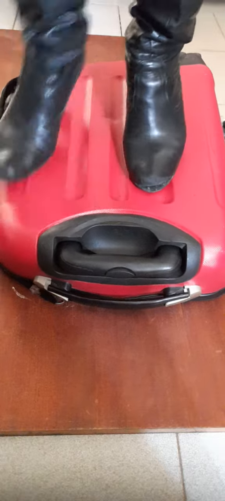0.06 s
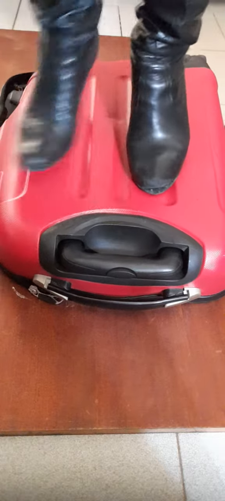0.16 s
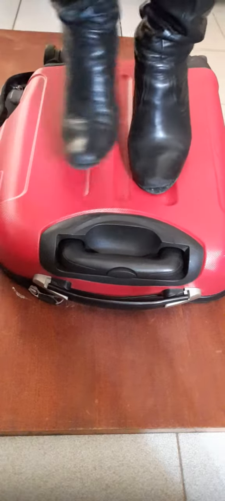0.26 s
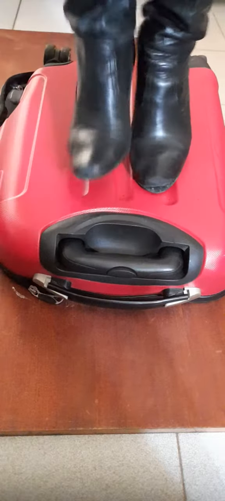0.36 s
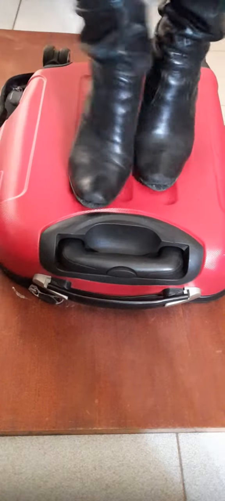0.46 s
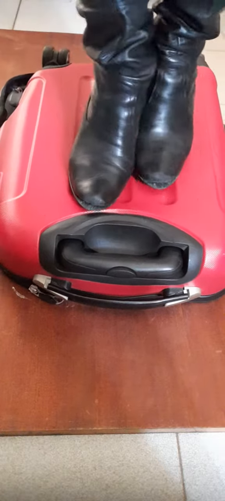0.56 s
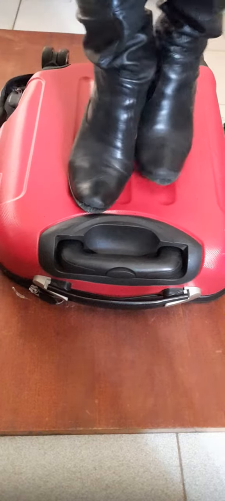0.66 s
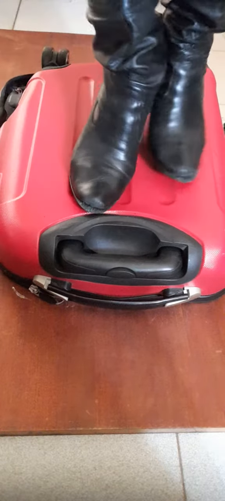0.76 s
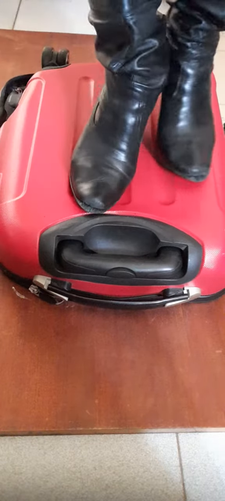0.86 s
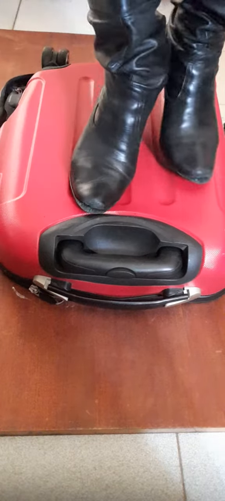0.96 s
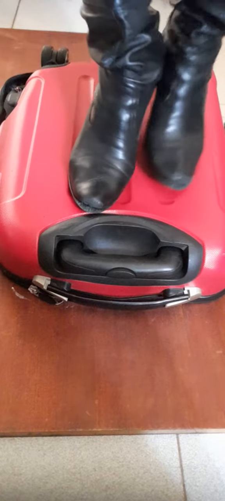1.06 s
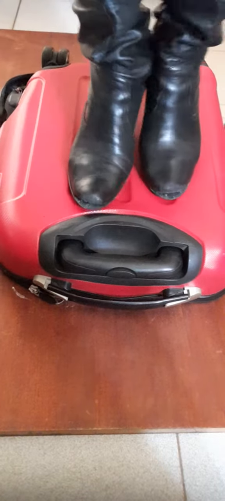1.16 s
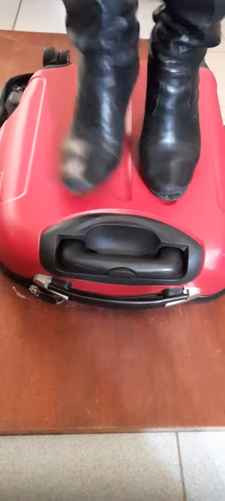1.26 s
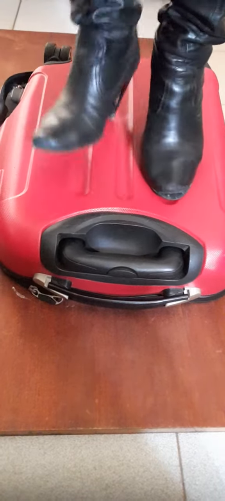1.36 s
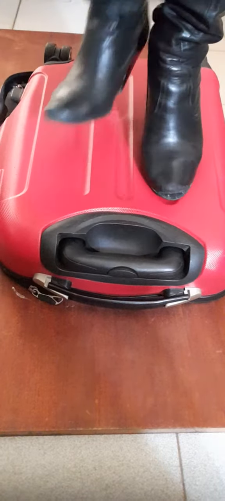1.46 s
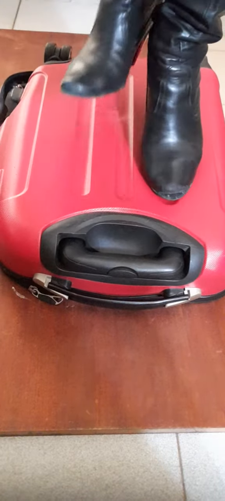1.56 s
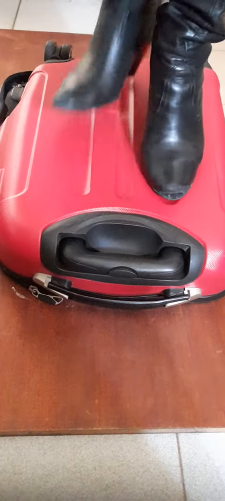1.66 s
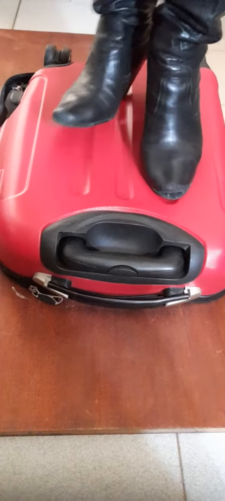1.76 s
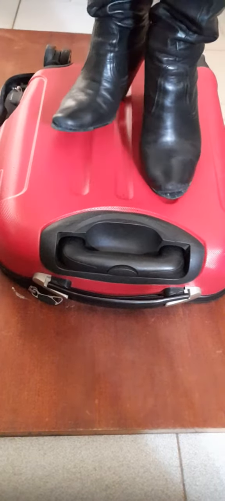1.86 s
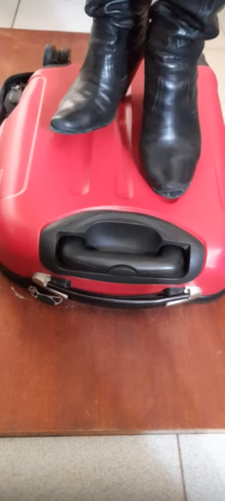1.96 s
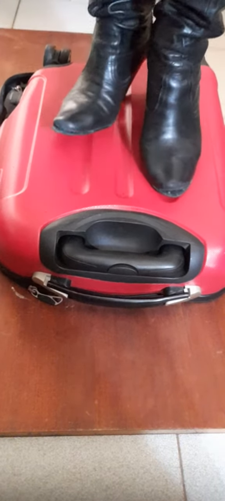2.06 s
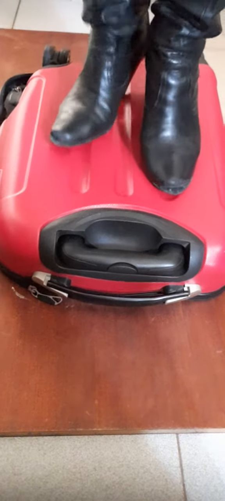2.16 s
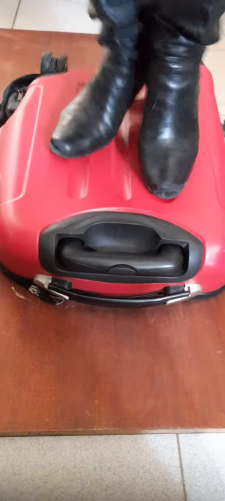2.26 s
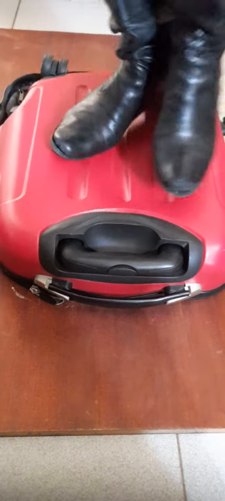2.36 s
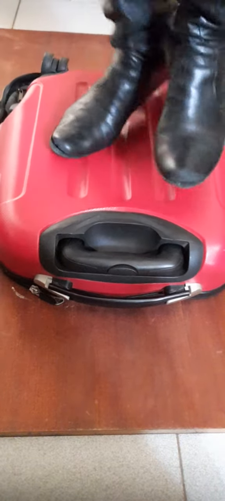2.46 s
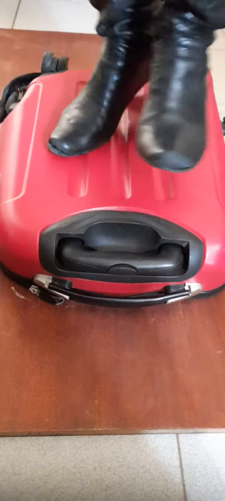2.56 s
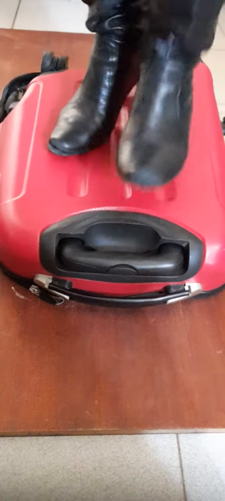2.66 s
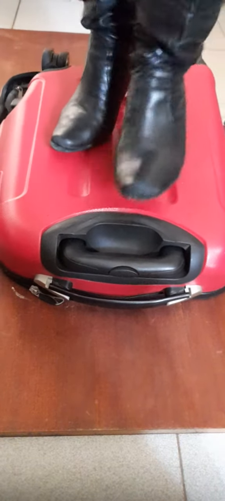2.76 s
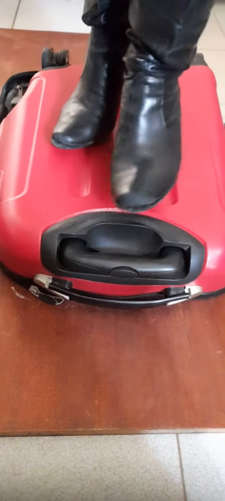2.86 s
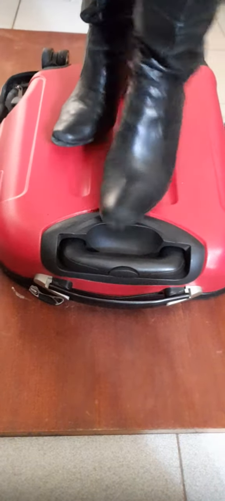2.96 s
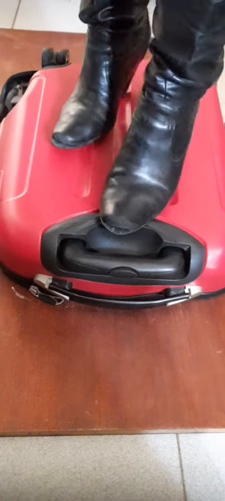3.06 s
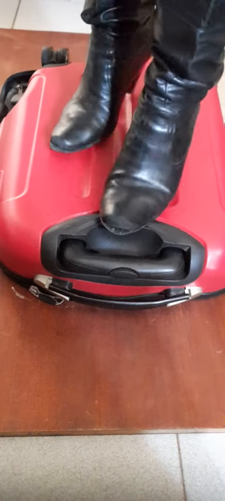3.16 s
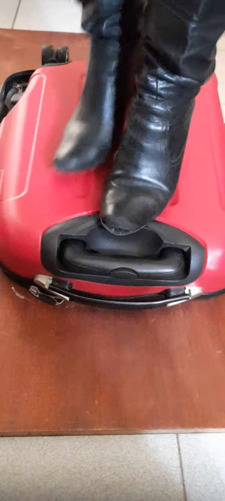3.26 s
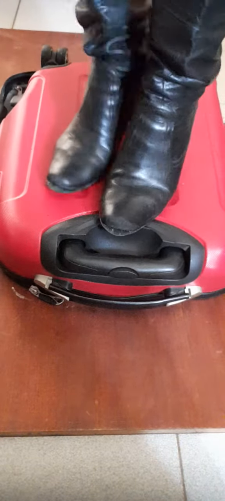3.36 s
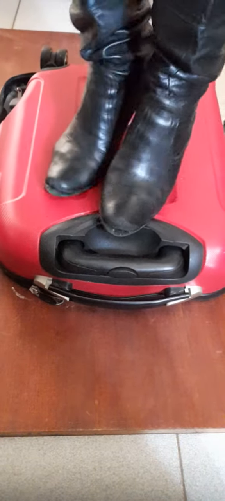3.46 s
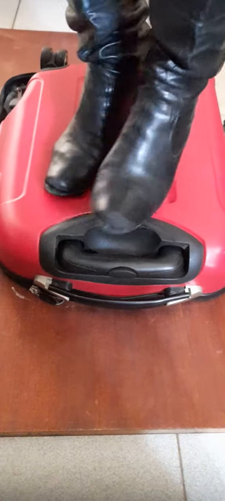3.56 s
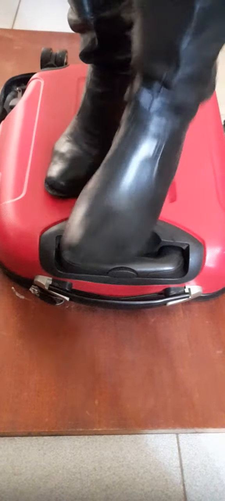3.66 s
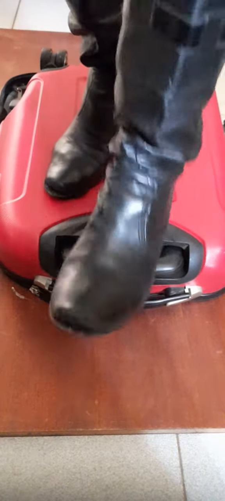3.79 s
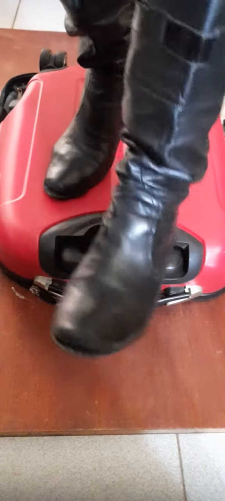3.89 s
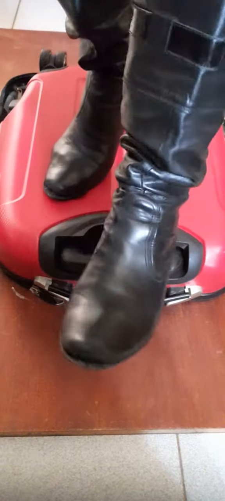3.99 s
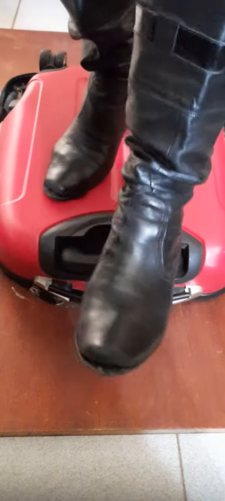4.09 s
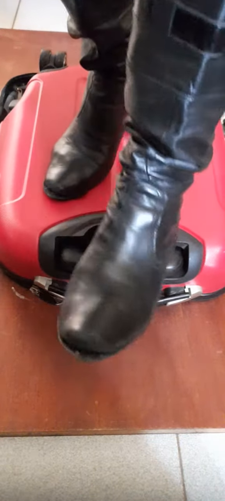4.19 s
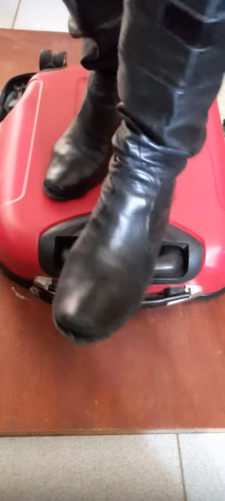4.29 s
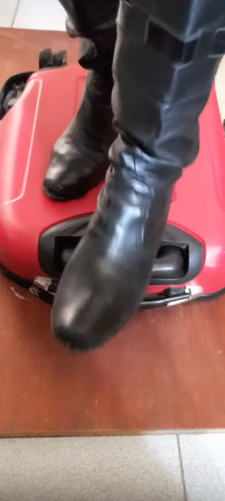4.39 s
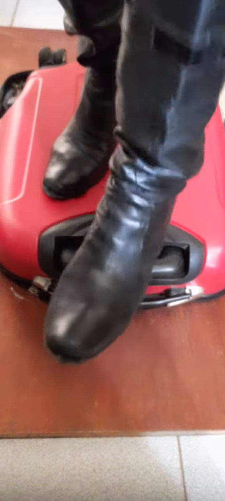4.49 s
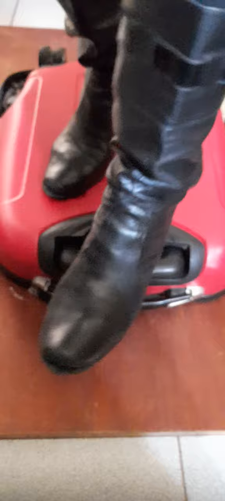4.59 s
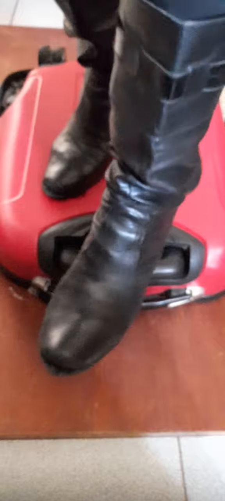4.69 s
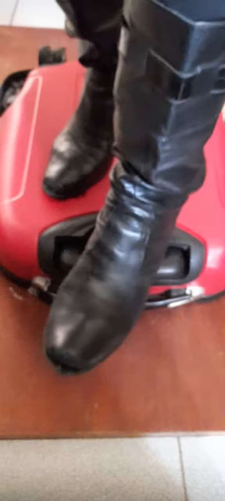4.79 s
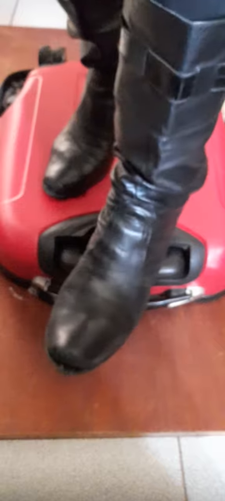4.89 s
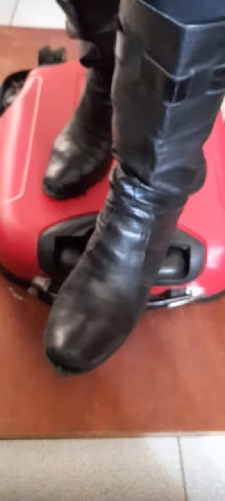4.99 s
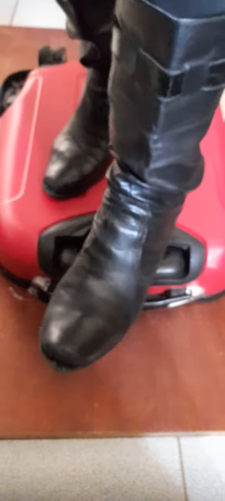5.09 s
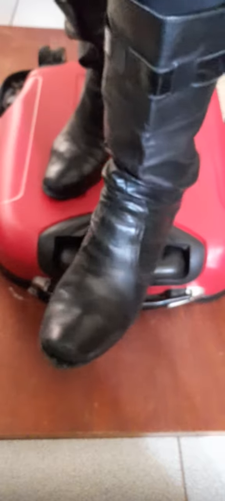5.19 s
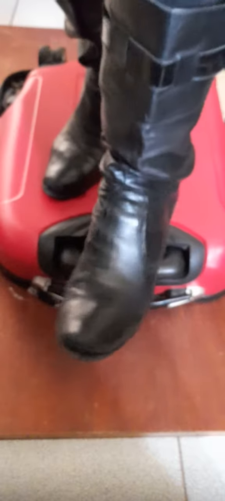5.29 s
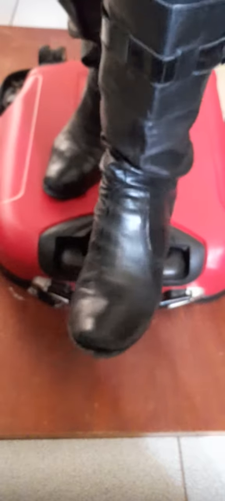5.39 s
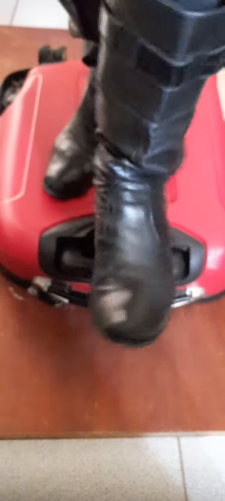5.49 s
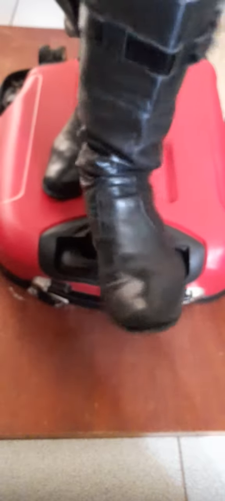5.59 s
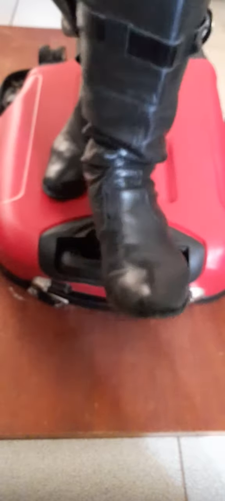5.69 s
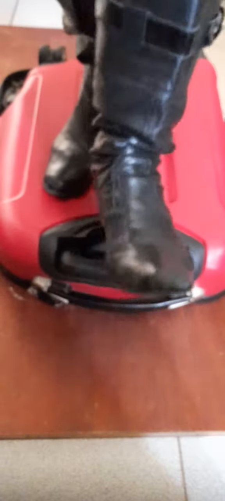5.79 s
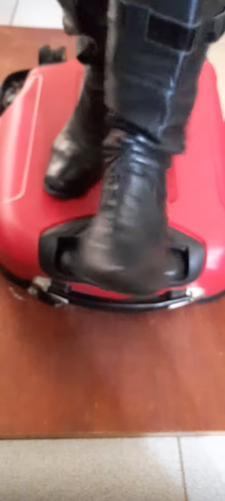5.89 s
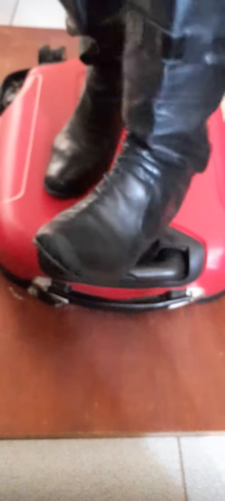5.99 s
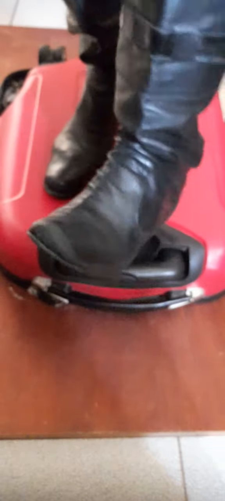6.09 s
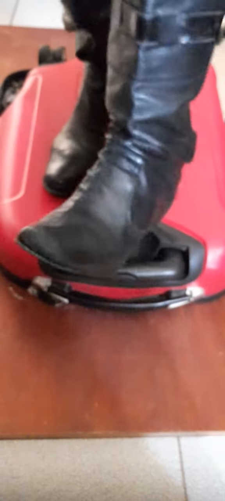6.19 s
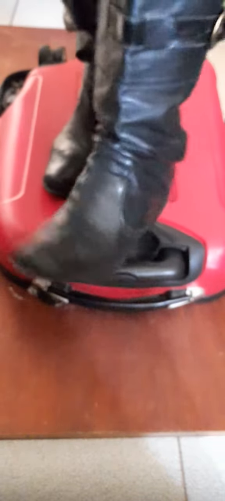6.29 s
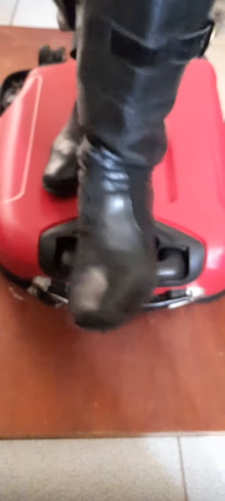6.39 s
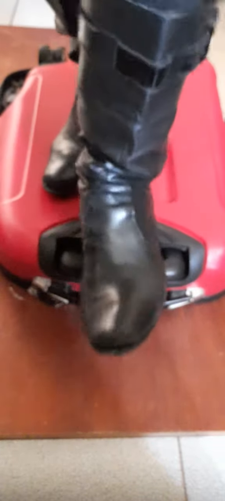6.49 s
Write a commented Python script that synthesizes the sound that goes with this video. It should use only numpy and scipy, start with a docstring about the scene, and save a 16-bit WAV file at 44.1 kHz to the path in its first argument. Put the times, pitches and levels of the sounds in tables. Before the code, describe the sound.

High-heeled boots tread unevenly on a hollow hard plastic suitcase, booming thuds with sharp snaps, creaks and faint zip jingles in a small room.

```python
"""High-heeled boots tread on a hard plastic suitcase lying on boards in a small tiled room, near a phone.
Treads boom, knock and snap at once; after a second weight rolls onto one foot and the plastic creaks. Harder
treads follow, the pull handle pings just after four seconds, and faint contacts close the scene. Soles scuff
and zip pulls jingle throughout. Shell and metal are decaying sines; cracks, snaps, scuffs and air are noise.
The room adds a diffuse tail; the two microphone ports differ in colour and delay."""
import sys
import numpy as np
from scipy import signal
from scipy.fft import rfft, irfft, next_fast_len
from scipy.io import wavfile

SR = 44100
rng = np.random.default_rng(int(sys.argv[2]) if len(sys.argv) > 2 else 0)


def int16_out(signal):
    """Quantize to a 16-bit WAV file."""
    q = np.round(np.clip(np.atleast_2d(signal).T, -1, 1) * 32767)
    wavfile.write(sys.argv[1], SR, q.astype(np.int16))


N = 288414  # length in samples

# Source levels are those ahead of the room and the microphone.
# still air, relative spectrum: (frequency [Hz], density [dB])
AIR_COLOUR = [(18, -65.5), (30, -3), (90, -44.5), (245, -14), (295, -5), (632, -13), (760, -11.5),
              (1190, -18), (2680, -19), (3980, -23), (4910, -12), (7470, -34.5), (9460, -18.5),
              (13700, -19.5), (16000, -50.5)]
AIR_RMS_DB = -68.5
# mains hum: (frequency [Hz], rms level [dB])
MAINS_HUM = [(99, -78.5), (297, -70.5)]
# diffuse tail of the room: (frequency [Hz], t60 [s], level [dB])
ROOM_TAIL = [(100, 0.46, 2), (189, 0.31, -7.5), (710, 0.46, 0.5), (1940, 0.39, 1), (4840, 0.34, 1),
             (11760, 0.34, -6)]
# likeness of diffuse sound at both ports: (frequency [Hz], likeness [share])
PORT_LIKENESS = [(100, 1), (400, 0.89), (1000, 0.86), (2500, 0.11), (6000, 0.1)]

# colour of the ports: (frequency [Hz], left minus right [dB])
PORT_BALANCE = [(60, -0.5), (110, -0.5), (200, 0.0), (380, -0.5), (700, -3.5), (1290, -5.5), (2380, -6.0),
                (4400, 1.5), (8120, 7.0), (15000, 14.0)]
# arrival at the ports: (frequency [Hz], lead of the left [s])
LEFT_LEAD = [(100, .00005), (600, .00013), (1550, .00032), (2300, .0004), (4000, .00036)]
# microphone colour common to both ports: (frequency [Hz], gain [dB])
CAPSULE_COLOUR = [(3000, 1.5), (3800, 0), (5000, 0.5), (7500, -6), (9500, -3.5), (14000, -4.5),
                  (15000, -17), (16300, -29.5)]
TOP_HZ, ROUND_AT = 16300, 1.2  # top cut; amplitude that rounded peaks approach

# soles scuffing on the shell: (loudest moment [s], level [dB], hiss above level [dB], swell [s])
SCUFFS = [(0.188, -46, 4, 0.3), (0.47, -38.5, -7, 0.051), (0.751, -62.5, 6, 0.296), (1.3, -51, -5, 0.18),
          (1.4, -51.5, 4.5, 0.076), (1.769, -39.5, -0.5, 0.058), (1.92, -68, -17.5, 0.16),
          (2.172, -58, 12.5, 0.028), (2.298, -40, -4, 0.23), (2.361, -33.5, -6.5, 0.026),
          (2.692, -45.5, 2, 0.009), (2.788, -68.5, 11, 0.3), (3.05, -55, -1, 0.043),
          (3.352, -43, -6.5, 0.0097), (3.762, -38.5, -1.5, 0.012), (3.93, -44, -8, 0.15),
          (4.0, -51.5, -5, 0.11), (4.221, -43, -9, 0.015), (4.241, -55, 21.5, 0.015),
          (4.441, -48, -1.5, 0.025), (5.301, -68, 3, 0.9), (5.478, -58, -6, 0.12),
          (5.639, -63.5, -4.5, 0.12), (5.988, -58, 1.5, 0.14), (6.05, -86, 7.5, 0.14),
          (6.39, -58.5, -2, 0.06), (6.5, -65.5, 2.5, .08)]
SWELL_DB = 28.5  # rise over the swell
RUB_FADE_DB_S, HISS_FADE_DB_S = 124.5, 151.5  # fading after the loudest moment, dB per second

# zip pulls knocking: (time [s], peak level [dB])
PULL_HITS = [(0.175, -36), (0.786, -40), (1.9804, -46.5), (2.61, -46), (3.092, -44), (3.4354, -40),
             (3.9494, -52), (4.508, -39), (5.5636, -35.5), (5.8376, -49.5), (6.0227, -30.5), (6.2986, -48),
             (6.4006, -40.5)]
# zip pull modes: (frequency [Hz], relative level [dB], t60 before the ring factor [s])
PULL_MODES = [(6880, -9, .02), (9930, -1, 0.026), (11400, 3, 0.09), (13500, 10, .03), (14050, -8, .03)]
# pull handle knocking: (time [s], peak level [dB])
HANDLE_KNOCKS = [(4.237, -16), (4.265, -57)]
# pull handle modes: (frequency [Hz], relative level [dB], t60 before the ring factor [s])
HANDLE_MODES = [(772, -2.5, 0.078), (1510, 6, 0.034), (1800, 4, 0.06), (2640, -7, 0.17)]

# snaps of plastic and leather under load: (time [s], peak level [dB], pitch [Hz])
SNAPS = [(0.1731, -15.5, 11400), (0.1902, -19, 3900), (0.221, -32, 13500), (0.2577, -30.5, 13500),
         (0.342, -49, 4010), (0.45, -29, 4580), (0.469, -9.5, 4140), (0.4968, -20.5, 8940),
         (0.6868, -39, 4560), (0.7087, -48, 4720), (1.1614, -38.5, 5050), (1.276, -32.5, 3800),
         (1.735, -23, 4290), (1.766, -19, 5000), (1.7758, -15, 4140), (1.814, -17.5, 11200),
         (1.8402, -20, 4100), (2.1465, -40, 4890), (2.167, -16.5, 4900), (2.2733, -34, 12200),
         (2.3157, -14.5, 5530), (2.333, -15.5, 3920), (2.6846, -23.5, 5150), (2.7138, -25, 4250),
         (2.7458, -20.5, 8050), (2.7808, -24.5, 4060), (3.0087, -46, 4950), (3.0419, -30, 4800),
         (3.1887, -44.5, 9850), (3.347, -33.5, 5130), (3.7519, -20.5, 4650), (3.8134, -23.5, 3900),
         (3.8377, -17.5, 12800), (3.8737, -23, 5400), (3.9766, -20.5, 7150), (4.2196, -28.5, 4350),
         (4.2372, -10, 5670), (4.4464, -24, 6540), (4.564, -36, 3990), (5.249, -42, 4520),
         (5.465, -42, 4690), (5.483, -40.5, 4300), (5.5597, -40, 14400), (6.385, -47.5, 11500)]
SNAP_TAIL, CREAK_TAIL = 0.58, 0.1  # rustle after a snap, relative to its start
# weight rolling onto one foot makes the plastic tick in an uneven run
CREAK_FROM_S, CREAK_TO_S, CREAK_GAP_S = 1.195, 1.44, 0.019
CREAK_DB, CREAK_SCATTER_DB, CREAK_HZ = -33, 3.0, 8020  # middle level, its spread, middle pitch

# contacts of heel and sole: (time [s], boom peak [dB], body peak [dB], knock peak [dB], boom pitch [Hz]) # each
# layer is set to its peak before the bass cut
TREADS = [(0.056, -37.5, -38, -43, 187), (0.094, -26, -13, -59, 200), (0.153, -11, -21, -26, 187),
          (0.182, -22.5, -25, -25, 163), (0.451, -18.5, -23.5, -23.5, 194.7),
          (0.468, -13.5, -14.5, -15, 160), (0.52, -22, -33, -44, 150.6), (0.812, -41, -42, -60, 219.6),
          (1.127, -40.5, -38, -49, 195), (1.161, -26, -26.5, -36.5, 164), (1.196, -26.5, -28, -31.5, 168.4),
          (1.292, -30, -34.5, -36, 185.8), (1.369, -36, -26.5, -39, 205), (1.385, -33, -33, -42.5, 140),
          (1.436, -25.5, -31.5, -38.5, 191), (1.511, -42, -45, -59.5, 208.3),
          (1.735, -19, -9.5, -34.5, 168), (1.749, -14.5, -13.5, -21, 160.5), (1.764, -14, -13, -14.5, 155),
          (1.791, -17.5, -31, -41, 154.6), (1.882, -29, -51, -35.5, 171.6), (1.983, -36.5, -55, -56.5, 184),
          (2.076, -41.5, -37.5, -57.5, 231.8), (2.101, -37, -38, -43.5, 193.8),
          (2.154, -30.5, -25, -50.5, 206), (2.165, -28, -28.5, -20, 184), (2.211, -25.5, -35, -36.5, 166),
          (2.244, -30.5, -23, -44, 204), (2.317, -23.5, -13, -15, 242), (2.332, -14.5, -16, -26.5, 186),
          (2.364, -7, -6, -8.5, 193.3), (2.383, -14, -10.5, -27, 255), (2.42, -19, -15, -31.5, 199),
          (2.637, -50, -31, -31, 218), (2.681, -49.5, -29.5, -30, 208.6), (2.714, -12.5, -16, -19, 223),
          (2.779, -37, -41.5, -39, 172), (3.011, -79, -45.5, -46, 174), (3.043, -25, -28, -30.5, 171),
          (3.259, -43, -49, -50, 178), (3.35, -27, -34, -30.5, 202), (3.358, -26.5, -28, -45, 261.5),
          (3.381, -30, -27, -41, 167.5), (3.511, -27.5, -38, -50.5, 168), (3.577, -28.5, -40, -41.5, 179),
          (3.751, -9, -12, -26, 221), (3.773, -11, -19.5, -34.5, 215), (3.837, -16.5, -17, -39, 162),
          (3.861, -17.5, -24.5, -20.5, 161), (3.88, -17.5, -20, -45.5, 245), (3.972, -19, -26, -32, 222.7),
          (4.065, -34, -40.5, -64, 198), (4.214, -40.5, -34, -34.5, 239.6), (4.236, -38, -19, -22, 238),
          (4.246, -32.5, -54, -19, 199), (4.266, -36.5, -36, -35, 191.6), (4.409, -22.5, -26.5, -37, 162),
          (4.447, -18.5, -25, -31.5, 219), (4.508, -41, -34, -59, 216), (4.551, -35.5, -52, -56, 151),
          (4.565, -35, -42, -34, 163.4), (4.657, -40.5, -59, -61, 182), (5.25, -65, -45.5, -45.5, 162),
          (5.403, -52.5, -57, -53, 234.7), (5.465, -47.5, -42.5, -43, 210), (5.726, -46.5, -53.5, -76, 201),
          (5.86, -54.5, -54.5, -54.5, 196), (5.98, -44.5, -41, -40, 210), (6.106, -55, -41, -49, 192),
          (6.195, -48.5, -52, -48.5, 188.6), (6.254, -42.5, -46, -54, 185.8), (6.385, -53, -44.5, -59, 200),
          (6.501, -62, -49, -52, 199)]
# shell modes of the case: (frequency [Hz], relative level [dB], t60 before the ring factor [s])
SHELL_MODES = [(111.2, -3, 0.065), (137.3, -6, 0.045), (162.4, 0, 0.07), (177.6, -1.5, 0.07),
               (200.4, 1, 0.065), (236.7, -2.5, 0.055), (268.8, -2, 0.07), (315, 3, 0.066),
               (346.5, -8.5, 0.18), (415, 0.5, 0.15), (482, -12, 0.13), (548, 18.5, 0.013), (665, -2, 0.15),
               (723, -11, 0.055), (925, 0, 0.01), (1032, -20, 0.035), (1195, 13.5, 0.053),
               (1450, 11.5, 0.036), (1860, -7, 0.0067), (1963, -8.5, 0.032), (2210, -15, 0.011),
               (2550, -28, 0.014)]
BODY_FROM_HZ, KNOCK_FROM_HZ = 280, 1100  # splits of the shell modes
BASS_CUT_HZ = 110
SWELL_HARD_S, SWELL_S_PER_DB = 0.003, 0.0007  # boom swell; more boom than body means a slower press
RING_HARD, RING_PER_DB = 0.85, 0.022  # ring factor of a full-scale blow; its growth per dB below that


def undb(db):
    """Turns decibels into an amplitude factor."""
    return 10 ** (np.asarray(db) / 20)


def on_log(hz, table, axis=1):
    """Reads a column of a table along log frequency."""
    table = np.array(table, float)
    return np.interp(np.log(np.maximum(hz, 1)), np.log(table[:, 0]), table[:, axis])


def band(x, lo_hz, hi_hz):
    """Keeps the band between two frequencies."""
    sos = signal.butter(2, [lo_hz, min(hi_hz, .45 * SR)], "band", fs=SR, output="sos")
    return signal.sosfilt(sos, x)


def peak(x, db):
    """Sets the highest peak of a sound to a level."""
    return x * undb(db) / np.max(np.abs(x))


def add(out, s, x):
    """Mixes x in at s seconds."""
    i = max(int(s * SR), 0)
    out[:, i:i + x.shape[-1]] += x[..., :N - i]


def pair(size):
    """Two noise spectra, alike in the bass and nearly unrelated in the treble."""
    hz = np.fft.rfftfreq(size, 1 / SR)
    likeness = np.clip(on_log(hz, PORT_LIKENESS), 0, 1)
    mid, side = rfft(rng.standard_normal((2, size)))
    shared = np.sqrt((1 + likeness) / 2) * mid
    opposed = np.sqrt((1 - likeness) / 2) * side * np.array([[1], [-1]])
    return hz, shared + opposed


def scattered(size, share):
    """Noise for both ports; nearby surfaces make a share of its power differ between them."""
    common, left, right = rng.standard_normal((3, size))
    share = np.clip(share, 0, 1)
    return np.sqrt(1 - share) * common + np.sqrt(share) * np.array([left, right])


def ring(modes, t, chance, stretch, scatter_db, detune):
    """Decaying modes; where the blow lands decides how strongly each one speaks."""
    hz, db, t60 = np.transpose(modes)[:, :, None]
    size = undb(db + scatter_db * chance[0][:, None])
    fade = np.exp(-np.log(1000) * t / (t60 * stretch))
    pitch = hz * (1 + detune * chance[1][:, None])
    return size * fade * np.sin(2 * np.pi * pitch * t)


def air():
    """Still air of the room as coloured noise, and a faint mains hum."""
    hz, noise = pair(N)
    hush = irfft(noise * undb(on_log(hz, AIR_COLOUR)), N)
    t = np.arange(N) / SR
    hum = sum(np.sqrt(2) * undb(db) * np.sin(2 * np.pi * f * t) for f, db in MAINS_HUM)
    return hush * undb(AIR_RMS_DB) / hush.std() + hum


def room(x):
    """Direct sound plus a diffuse tail whose every band fades at its own rate."""
    size = int(.7 * SR)
    t = np.arange(size) / SR
    hz, noise = pair(size)
    tail = np.zeros((2, size))
    for centre in 60 * 2 ** np.arange(0, 8.5, .5):
        # overlapping triangles half an octave apart
        weight = np.clip(1 - 2 * np.abs(np.log2(np.maximum(hz, 1) / centre)), 0, 1)
        part = irfft(noise * weight, size)
        fade = np.exp(-np.log(1000) * t / on_log(centre, ROOM_TAIL))
        fade = fade * (1 - np.exp(-t / 0.0032))  # the tail builds up in milliseconds
        level = undb(on_log(centre, ROOM_TAIL, axis=2))
        tail += part * fade * level / np.sqrt(np.sum(fade ** 2))
    return x + signal.fftconvolve(x.mean(0)[None], tail, axes=1)[:, :N]


def strokes(levels_db, fade_db_s):
    """Every scuff swells to its loudest moment and then fades steadily; their powers add."""
    t, power = np.arange(N) / SR, 0
    for (s, _, _, swell_s), db in zip(SCUFFS, levels_db):
        rise_db = SWELL_DB * (s - t) / max(swell_s, .01)
        drop_db = np.where(t < s, rise_db, fade_db_s * (t - s))
        power = power + undb(db - drop_db) ** 2
    return np.sqrt(power)


def scuff():
    """Dense uneven grains of rubbing that drive the shell and hiss."""
    _, db, hiss_db, _ = np.transpose(SCUFFS)
    # a new grain size every 40 samples
    size_db = 2.5 * np.minimum(rng.exponential(size=N // 40 + 1), 4)
    grains = scattered(N, 1.0) * undb(size_db).repeat(40)[:N]
    body = band(grains, 500, 2700)
    hiss = band(grains, 5600, 22000)
    boom = band(grains.mean(0), 230, 360)
    rub = body / body.std() + undb(4.5) * boom / boom.std()
    rubbing = rub * strokes(db, RUB_FADE_DB_S)
    return rubbing + hiss / hiss.std() * strokes(db + hiss_db, HISS_FADE_DB_S)


def small_parts(hits, modes, scatter_db):
    """Small hard parts ring thin and clear in a few modes, each hit with its own balance."""
    out, t = np.zeros((2, N)), np.arange(int(.25 * SR)) / SR
    chance = rng.standard_normal((len(hits), 2, len(modes)))
    for (s, db), luck in zip(hits, chance):
        tone = ring(modes, t, luck, 0.86, scatter_db, detune=0.012).sum(0)
        add(out, s, peak(tone, db))
    return out


def creak():
    """Stress let go in an uneven run of snaps, scattered in time, level and pitch."""
    starts = np.arange(CREAK_FROM_S, CREAK_TO_S, CREAK_GAP_S)
    luck = rng.standard_normal((len(starts), 3)).T
    times = starts + 0.13 * CREAK_GAP_S * luck[0]
    levels_db = CREAK_DB + CREAK_SCATTER_DB * luck[1]
    pitches_hz = np.clip(CREAK_HZ * np.exp(0.42 * luck[2]), 4000, 13500)
    return np.transpose([times, levels_db, pitches_hz])


def ticks():
    """Loaded plastic and leather snap in short noise bursts, broad with a centre of their own."""
    out, t = np.zeros((2, N)), np.arange(int(.05 * SR)) / SR
    run = creak()
    tails = [SNAP_TAIL] * len(SNAPS) + [CREAK_TAIL] * len(run)
    for (s, db, hz), tail in zip([*SNAPS, *run], tails):
        fade = np.exp(-t / 0.00014) + tail * np.exp(-t / 0.0053)
        snap = scattered(len(t), 0.9) * fade
        centred = band(snap, hz / 1.8, hz * 1.425)
        add(out, s, peak(centred + band(snap, 2500, 15000), db))
    return out


def boots():
    """Boom, body and knock of the shell's modes; loose parts rattle in the upper ones."""
    out, t = np.zeros((2, N)), np.arange(int(.2 * SR)) / SR
    hz = np.array(SHELL_MODES)[:, 0]
    low, high = hz < BODY_FROM_HZ, hz > KNOCK_FROM_HZ
    chance = rng.standard_normal((len(TREADS), 2, len(SHELL_MODES)))
    for (s, boom_db, body_db, knock_db, boom_hz), luck in zip(TREADS, chance):
        # a lighter tread damps the shell less
        stretch = np.clip(RING_HARD - RING_PER_DB * max(boom_db, body_db), .3, 3)
        modes = ring(SHELL_MODES, t, luck, stretch, scatter_db=3.0, detune=0.022)

        # the loaded panel favours the modes near its own pitch
        near = np.exp(-(np.log(hz[low] / boom_hz) / .085) ** 2)
        # the weight comes on over some milliseconds, more slowly under a soft sole
        swell_s = SWELL_HARD_S + SWELL_S_PER_DB * np.clip(boom_db - body_db, 0, 15)
        boom = near @ modes[low] * (1 - np.exp(-t / swell_s))

        # noise of the crack and rattle
        fade = np.exp(-t / 0.0042) + 0.84 * np.exp(-t / (0.004 * stretch))
        thud = band(band(scattered(len(t), 0.033) * fade, 190, 1330), 170, 1170)
        body = peak(modes[~low & ~high].sum(0), 0) + peak(thud, -5)
        crack = band(band(scattered(len(t), 0.85) * fade, 1000, 2400), 650, 3600)
        knock = peak(modes[high].sum(0), -16.0) + peak(crack, 0)
        add(out, s, peak(boom, boom_db) + peak(body, body_db) + peak(knock, knock_db))
    # deep bass is cut away
    return signal.sosfilt(signal.butter(2, BASS_CUT_HZ, "high", fs=SR, output="sos"), out)


def scene():
    """Boots, snaps, small parts and scuffs sound in the room, over its still air."""
    pulls = small_parts(PULL_HITS, PULL_MODES, scatter_db=8.0)
    handle = small_parts(HANDLE_KNOCKS, HANDLE_MODES, scatter_db=3.0)
    return room(boots() + ticks() + pulls + handle + scuff()) + air()


def record(dry):
    """The left port hears earlier and brighter, the right fuller in the middle; peaks round off, the top is cut."""
    size = next_fast_len(N + 4096)
    hz = np.fft.rfftfreq(size, 1 / SR)
    # half of the level and time difference goes to each port, in opposite directions
    lead = np.exp(1j * np.pi * hz * on_log(hz, LEFT_LEAD))
    half = undb(on_log(hz, PORT_BALANCE) / 2) * lead
    coloured = rfft(dry, size) * undb(on_log(hz, CAPSULE_COLOUR))
    ports = irfft(coloured * np.array([half, 1 / half]), size)[:, :N]
    rounded = ROUND_AT * np.tanh(ports / ROUND_AT)
    return signal.sosfilt(signal.ellip(8, .2, 70, TOP_HZ, fs=SR, output="sos"), rounded)


dry = scene()
out = record(dry)
int16_out(out)
```